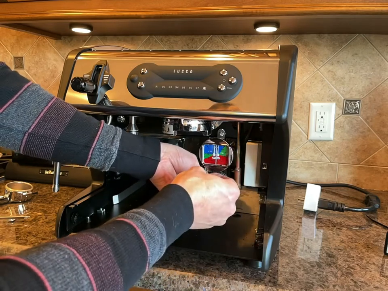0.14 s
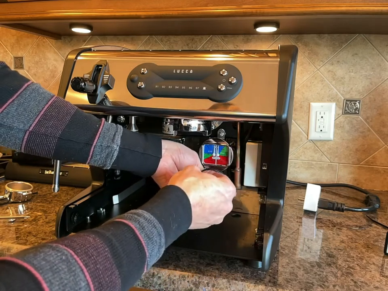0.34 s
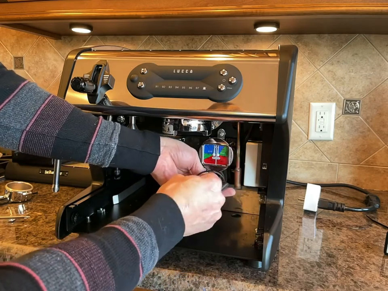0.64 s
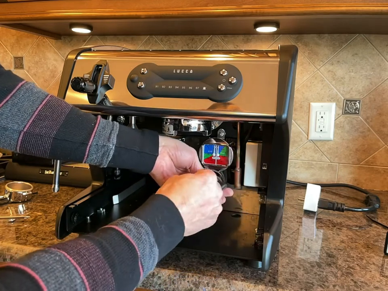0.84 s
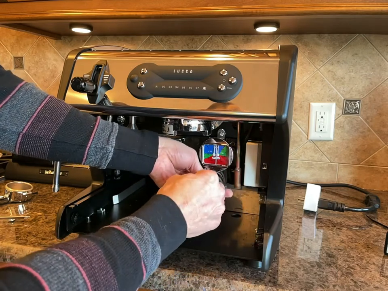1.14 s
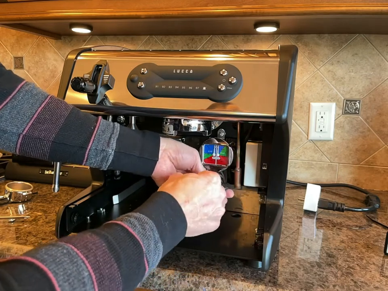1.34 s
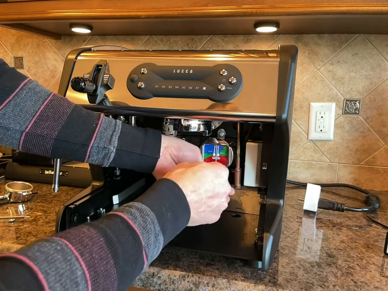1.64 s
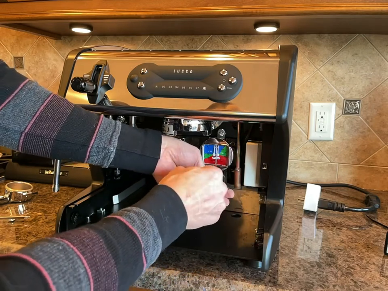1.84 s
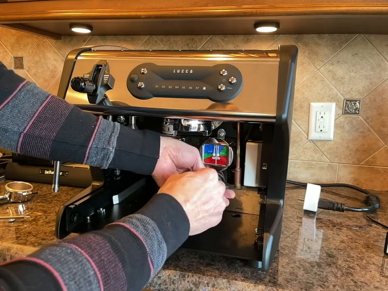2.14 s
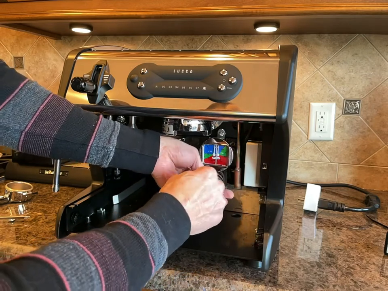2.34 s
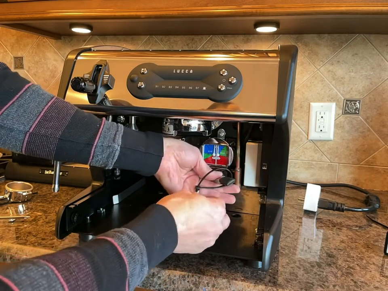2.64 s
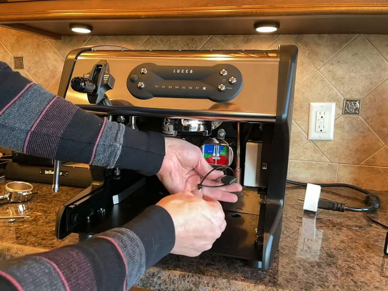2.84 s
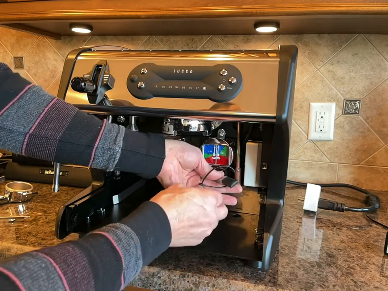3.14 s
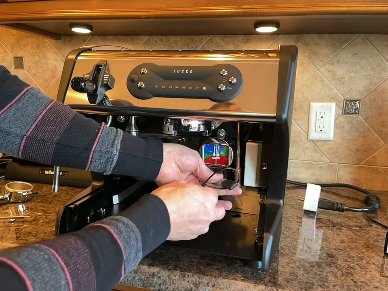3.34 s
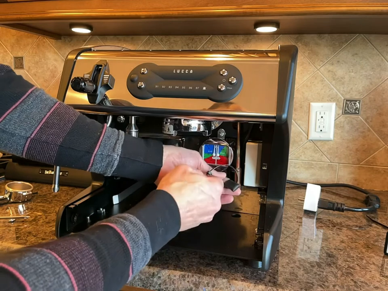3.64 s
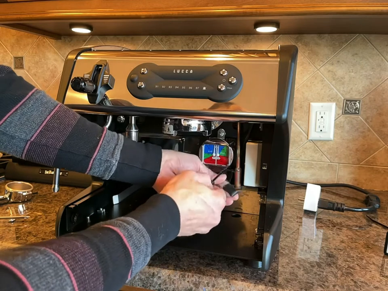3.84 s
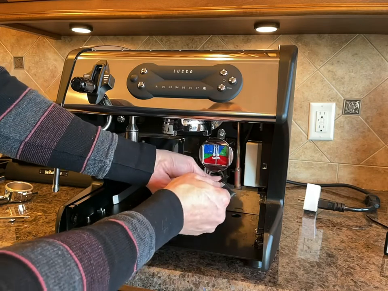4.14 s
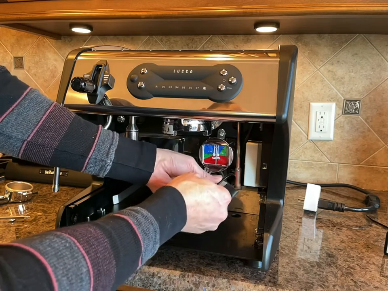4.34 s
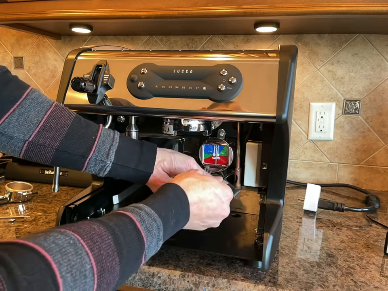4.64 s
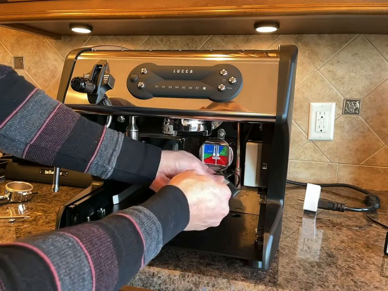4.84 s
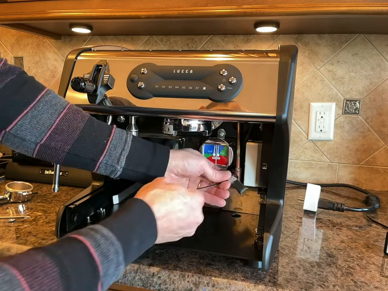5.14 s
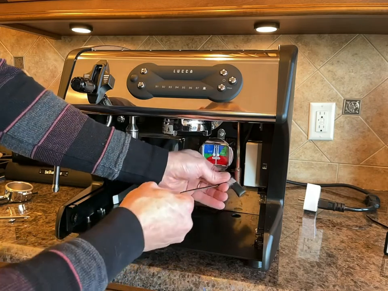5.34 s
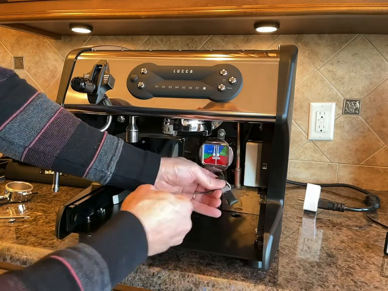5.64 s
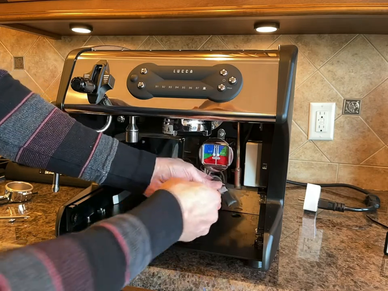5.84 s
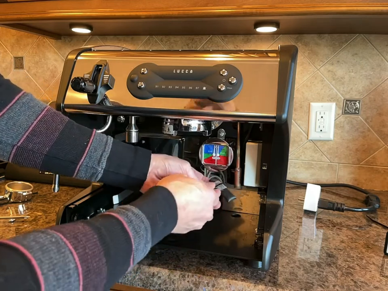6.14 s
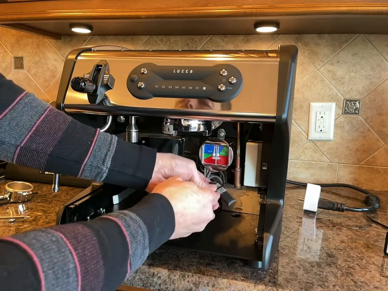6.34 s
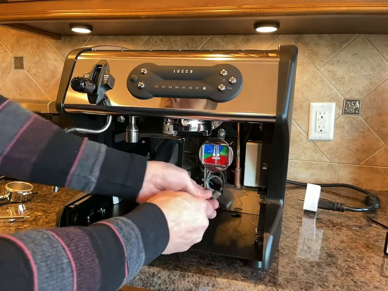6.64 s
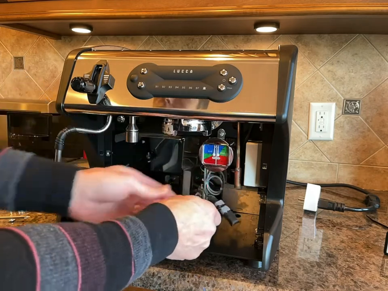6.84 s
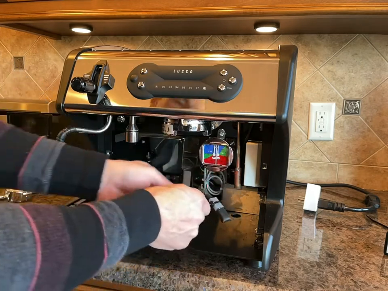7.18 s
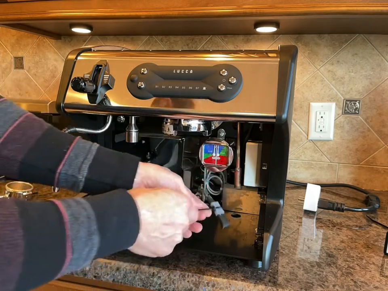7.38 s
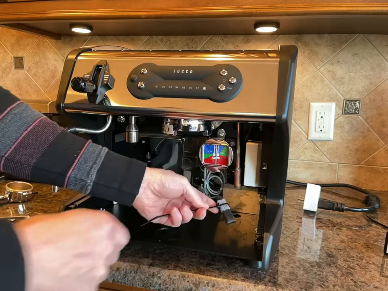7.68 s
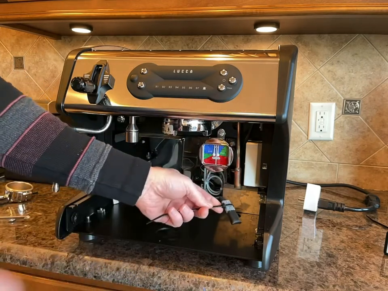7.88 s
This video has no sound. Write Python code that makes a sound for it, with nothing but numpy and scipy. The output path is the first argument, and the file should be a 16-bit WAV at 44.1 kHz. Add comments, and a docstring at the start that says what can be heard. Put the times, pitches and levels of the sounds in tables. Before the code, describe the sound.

A low, steady appliance hum fills a kitchen while a nylon zip tie is fitted nearby. Its tip and fingernails tick against a hose and metal casing, and the catch snaps over several single teeth. The strap slides softly through the fingers, then is pulled in one fast ratcheting zip, ending in slow, tight clicks and a couple of light knocks, each with a brief echo.

```python
"""Tightening a zip tie

A nylon zip tie is pulled tight round a hose inside an espresso machine on a kitchen counter.
Its pawl, the tiny catch in the tie's head, snaps over single teeth, races through one long zip
and ends in slow, tight clicks. Fingers tap and rub the strap. The metal housing and the room
echo the clicks and taps over a low appliance hum."""
import sys
import numpy as np
from scipy import signal
from scipy.fft import rfft, irfft, next_fast_len
from scipy.io import wavfile
from scipy.ndimage import map_coordinates

SR = 44100
rng = np.random.default_rng(int(sys.argv[2]) if len(sys.argv) > 2 else 0)


def materialize(psi):
    """Save the field psi as 16-bit PCM at rate SR to the path in sys.argv[1].

    A 1-D psi becomes a single channel; in a 2-D psi each row is a channel.
    """
    bounded = np.clip(np.atleast_2d(psi).T, -1, 1)
    quanta = np.round(bounded * 32767).astype(np.int16)
    wavfile.write(sys.argv[1], SR, quanta)


N = 353241
TIME = np.arange(N) / SR
CLICK_SAMPLES = 1024
CLICK_HZ = np.fft.rfftfreq(CLICK_SAMPLES, 1 / SR)  # the frequencies a click is built from
# (loose, tight): as the strap is drawn out, its free end gets longer and rings lower and weaker
STRAP_HZ, STRAP_DB = (2508, 1845), (-4.5, -10)

# how fast the strap runs in the long pull: time_s, teeth_per_s
PULL_SPEED = [(4.814, 68.5), (4.87, 99.3), (4.918, 250.0), (4.949, 298.8), (5.009, 225.4), (5.042, 240.8),
              (5.137, 225.0), (5.161, 191.5), (5.234, 170.5), (5.322, 53.3)]


def amp(db):
    """Turn decibels into a gain to multiply by."""
    return 10 ** (np.asarray(db) / 20)


def unit(x):
    """Scale a signal so its average strength (rms) is 1."""
    return x / np.sqrt(np.mean(x ** 2) + 1e-20)


def along(points, hz):
    """Read between the rows of a (frequency, value) table, on a musical (log) scale."""
    frequencies, values = np.transpose(points)
    return np.interp(np.log(hz + 1), np.log(frequencies + 1), values)


def add(track, start_s, sound):
    """Mix a sound into the track."""
    start = int(round(start_s * SR))
    track[start:start + len(sound)] += sound[:N - start]


def wobble(rate):
    """A smooth random curve through `rate` new values a second."""
    return map_coordinates(rng.standard_normal(int(N * rate / SR) + 4), [TIME * rate])


def swell(t, middle_s, length_s):
    """A smooth rise and fall."""
    return np.exp(-(2 * (t - middle_s) / length_s) ** 2)


def filtered(x, gain_at):
    """Turn each frequency up or down by gain_at(hz)."""
    size = next_fast_len(len(x) + 8192)
    return irfft(rfft(x, size) * gain_at(np.fft.rfftfreq(size, 1 / SR)), size)[:len(x)]


def noise(colour):
    """Noise of strength 1, shaped by a (frequency, decibels) table."""
    return unit(filtered(rng.standard_normal(N), lambda hz: amp(along(colour, hz))))


def resonance(centre_hz, width_hz):
    """A part rings most at its own note: gain 1 there, less on either side."""
    return 1 / np.hypot(1, (CLICK_HZ ** 2 - centre_hz ** 2) / ((CLICK_HZ + 1) * width_hz))


def pulse(gain):
    """The sharpest click that has this gain at each frequency."""
    cepstrum = irfft(np.log(np.maximum(gain, 1e-6)))
    fold = 1 + np.sign(CLICK_SAMPLES / 2 - np.arange(CLICK_SAMPLES))  # packs the energy at the start
    fold[0] = 1
    return irfft(np.exp(rfft(cepstrum * fold)))


def room_tone():
    """An appliance hums steadily over a soft rush of air."""
    # the appliance's tones: pitch_hz, level_db
    tones = [(75.4, -49), (183.0, -66.5), (376.8, -81)]
    # colour of the air: frequency_hz, level_db
    air = [(25, -24), (45, -21.5), (75, -20), (100, -19), (165, -20.5), (195, -12), (225, -17.5),
           (310, -21.5), (400, -25.5), (750, -30.5), (2300, -41), (9800, -52), (11300, -54.5), (13500, -55)]
    hum = np.zeros(N)
    for hz, db in tones:
        hum += amp(db + 0.9 * wobble(3.4)) * np.sin(2 * np.pi * hz * TIME + 0.071 * wobble(1.2))
    return hum + amp(-57) * noise(air)


def taps():
    """The strap's tip and the fingernails touch hose and housing; each spot has its own hollow note."""
    # light touches: start_s, level_db, pitch_hz, tick_boost_db
    touches = [(0.228, -34, 1800, -3), (.419, -23, 3630, -8.5), (0.5429, -26, 4530, 13),
               (.622, -25, 3950, 13.5), (0.6508, -21.5, 2730, 14), (0.6697, -20, 2320, 13.5),
               (.684, -20, 2500, 10.5), (.829, -24, 2310, -5), (0.853, -23.5, 2300, -9),
               (1.254, -31, 2730, 1), (2.4294, -25.5, 3040, -2.5), (2.6964, -28.5, 1580, -2.5),
               (3.2606, -23.5, 4370, 2), (3.5155, -43, 1400, 18.5), (4.039, -39, 1430, 6),
               (4.231, -33.5, 3080, 14), (5.7662, -22, 1485, -3), (5.907, -25, 2810, -1),
               (6.7059, -32.5, 2785, -4), (7.583, -21.5, 2710, -0.5)]
    # colour of the hollow knock: frequency_hz, level_db
    knock_colour = [(200, -17.5), (900, -4.5), (1600, 1.5), (2600, 1), (4500, -1.5), (8000, -5.5),
                    (16000, -37)]
    # colour of the bright tick: frequency_hz, level_db
    tick_colour = [(1500, -19), (4000, -10.5), (7000, -5.5), (11500, -0.5), (16000, -8)]
    out = np.zeros(N)
    for start_s, db, pitch_hz, tick_db in touches:
        knock = amp(along(knock_colour, CLICK_HZ)) * (1 + amp(10.5) * resonance(pitch_hz, width_hz=91))
        tick = amp(along(tick_colour, CLICK_HZ) + tick_db)
        click = amp(db) * pulse(np.hypot(knock, tick))
        add(out, start_s + 0.001, rebounds(click, gap_s=0.0005, bounce=0.65))
        echo = echoes(housing_db=-1, housing_fade_s=0.065, room_db=-10.5)
        add(out, start_s + 0.00083, signal.fftconvolve(click, echo))
    return out


def rebounds(click, gap_s, bounce):
    """A part bounces as it lands, spreading its click into quick, fading repeats."""
    delay = np.exp(-2j * np.pi * CLICK_HZ * gap_s)
    return irfft(rfft(click) * (bounce + delay) / (1 + bounce * delay))


def echoes(housing_db, housing_fade_s, room_db):
    """Sound scatters quickly inside the metal housing and dies away slowly in the kitchen."""
    # time the kitchen's echo takes to fall by 60 dB: frequency_hz, fade_s
    kitchen = [(300, 0.54), (2500, 0.5), (9000, .42), (12000, 0.27), (16000, .25)]
    t = np.arange(SR // 2) / SR
    housing = rng.standard_normal(len(t)) * amp(-60 * t / housing_fade_s) * (t > 0.0006)
    hz, frame_s, bands = signal.stft(rng.standard_normal(len(t)), SR, nperseg=256)
    fade = amp(-60 * frame_s / along(kitchen, hz)[:, None])
    room = signal.istft(bands * fade, SR, nperseg=256)[1][:len(t)]
    room *= 1 - np.exp(-t / 0.0031)  # the echo takes a moment to build
    return (amp(housing_db) * housing / np.linalg.norm(housing)
            + amp(room_db) * room / np.linalg.norm(room))


def rubbing():
    """The ribbed strap slides through the fingers with a fine, uneven grain."""
    # slides of the strap: middle_s, length_s, hiss_db, skin_over_hiss_db
    slides = [(0.494, .03, -70, 5), (0.6, 0.053, -65, 8), (.965, 0.062, -69, -2), (1.256, 0.022, -63, 3),
              (2.926, .11, -69.5, 4), (3.073, 0.069, -68.5, 5.5), (3.239, 0.068, -63.5, 7),
              (3.345, 0.068, -65.5, -2), (3.505, 0.13, -60, -12), (3.594, 0.043, -60.5, -8),
              (3.728, 0.13, -63, -1), (4.148, 0.013, -68.5, 11), (4.198, 0.61, -72, 4.5),
              (5.748, 0.052, -55.5, -7), (5.907, .02, -58.5, 4.5), (5.988, .04, -67, -5),
              (6.17, 0.18, -68.5, -1), (7.335, 0.2, -67.5, -0.5), (7.522, 0.15, -58, -3),
              (7.92, 0.4, -73, 7.5)]
    # colour of the strap's hiss: frequency_hz, level_db
    hiss_colour = [(2000, -12.5), (5000, -4.5), (7000, -4.5), (9800, -5.5), (11300, 5.5), (13000, -3.5),
                   (15500, -0.5), (16500, -30.5)]
    # colour of the rubbing skin: frequency_hz, level_db
    skin_colour = [(400, 9.5), (1500, 0), (2500, 4), (5000, 0), (8000, -1), (16000, -22)]
    fidget = amp(-84.5 + 2.5 * wobble(12))  # the hands never quite rest
    hiss_gain, skin_gain = np.zeros((2, N))
    for middle_s, length_s, hiss_db, skin_db in slides:
        slide = amp(hiss_db) * swell(TIME, middle_s, length_s)
        hiss_gain += slide
        skin_gain += amp(skin_db) * slide
    grain = unit(amp(1.4 * wobble(400) + 1.5 * wobble(35)))
    hiss = np.hypot(hiss_gain, fidget) * noise(hiss_colour)
    skin = np.hypot(skin_gain, fidget) * noise(skin_colour)
    return grain * (hiss + skin)


def scuffs():
    """Skin drags over plastic in a short swell of tiny slips."""
    # finger strokes: middle_s, length_s, level_db, centre_hz
    strokes = [(0.647, 0.051, -54, 3860), (6.082, 0.057, -52, 2020), (6.774, .06, -51, 3700)]
    out = np.zeros(N)
    for middle_s, length_s, db, centre_hz in strokes:
        slips = rng.standard_normal(N) * amp(2.9 * wobble(450))
        band = filtered(slips, lambda hz: np.hypot(1, 1.56 * (hz / centre_hz - centre_hz / (hz + 1))) ** -1.22)
        out += amp(db) * swell(TIME, middle_s, length_s) * unit(band)
    return out


def tooth(pawl_hz, strap_hz, upper_hz, strap_db, head_db, treble_db):
    """The pawl slips off a tooth; pawl, head and strap each ring briefly."""
    # colour of the pawl's snap: frequency_hz, level_db
    pawl_colour = [(1500, -41.5), (6000, -19), (7200, -9.5), (9900, -8.5), (10900, 5.5), (12400, -0.5),
                   (13500, -12), (16500, -9.5)]
    # colour of the strap: frequency_hz, level_db
    strap_colour = [(200, -8.5), (850, -9), (1250, 0), (2000, -3.5), (3300, -2.5), (4200, -1.5),
                    (4900, -0.5), (5900, -2), (7100, -1.5), (10000, -13)]
    # the snap's highest treble: frequency_hz, level_db
    treble_colour = [(10000, -28.5), (12200, -7.5), (13200, -1), (14200, -0.5), (15600, -3), (16600, -17.5)]
    pawl = amp(along(pawl_colour, CLICK_HZ) - 4.5) * (1 + amp(2.5) * resonance(pawl_hz, width_hz=360))
    # the bending strap has two notes and gives off little sound below the lower one
    bending = amp(-12) + amp(-2) / np.hypot(1, (strap_hz / (CLICK_HZ + 1)) ** 4)
    bending += amp(2) * resonance(strap_hz, width_hz=310) ** 2
    bending += amp(-0.5) * resonance(upper_hz, width_hz=600) ** 2
    strap = amp(along(strap_colour, CLICK_HZ) + strap_db) * bending
    head = amp(head_db) * resonance(centre_hz=9080, width_hz=2200) ** 2
    treble = amp(along(treble_colour, CLICK_HZ) + treble_db)
    return pulse(np.linalg.norm([pawl, strap, head, treble], axis=0))


def teeth_passed():
    """A running count of the teeth that the long pull draws through the head."""
    return np.cumsum(np.interp(TIME, *np.transpose(PULL_SPEED), left=0, right=0)) / SR


def tightness_at(times):
    """How far the long pull has got: 0 is loose, 1 is tight."""
    passed = teeth_passed()
    return np.interp(times, TIME, passed / passed[-1])


def between(loose, tight, tightness):
    """A value on its way from loose to tight."""
    return loose + tightness * (tight - loose)


def strap_note(loose_hz, tight_hz, tightness):
    """The strap's note falls as its free end gets longer: fast at first, then slowly."""
    growth = 2.4  # length gained in the pull, divided by the starting length
    return tight_hz + (loose_hz - tight_hz) * (1 - tightness) / (1 + growth * tightness)


def single_clicks():
    """The pawl takes one tooth at a time; the hands shift, so each click echoes differently."""
    # single teeth: start_s, level_db, pawl_hz, treble_boost_db, head_db
    teeth = [(1.3156, 4, 10800, 1.5, -1), (1.3389, 5.5, 10300, 1.5, 3), (1.3827, 5, 11100, 4.5, 3.5),
             (1.8947, 7.5, 10500, -6, 2.5), (1.9897, 6.5, 11700, -9.5, 5), (2.19, 7.5, 10540, -10, 6.5),
             (5.3442, 5, 11800, 0, -1), (5.387, 7, 12000, 0, 0.5), (5.4218, 6, 11800, 4.5, 1),
             (5.448, 7, 12000, 5, -2), (5.4963, -1, 10000, 4, 4), (5.5516, 0.5, 10100, -0.5, 3.5),
             (6.2968, 2, 11100, 5, 4), (6.338, 0.5, 11300, -1, 2), (6.406, 1, 8700, -8.5, 2),
             (6.4709, -1, 8300, -7, 2.5), (6.5852, 0, 9200, -12.5, 1.5)]
    out = np.zeros(N)
    times = [row[0] for row in teeth]
    for (start_s, db, pawl_hz, treble_db, head_db), tightness in zip(teeth, tightness_at(times)):
        strap_db = between(*STRAP_DB, tightness) + 0.418 * treble_db  # a sharper snap rings it more
        click = amp(db) * tooth(
            pawl_hz, strap_hz=strap_note(*STRAP_HZ, tightness), upper_hz=between(3300, 3550, tightness),
            strap_db=strap_db - db, head_db=head_db - db, treble_db=treble_db)
        gap_s = 0.00034 * np.exp(0.21 * rng.standard_normal())
        add(out, start_s + 0.00051, rebounds(click, gap_s, bounce=0.71))
        echo = echoes(housing_db=0, housing_fade_s=0.05, room_db=-9.5)
        echo *= amp(between(-2.5, -4.5, tightness))
        add(out, start_s + 0.001, signal.fftconvolve(click, echo))
    return out


def strap_ping(start_s, level_db, pitch_hz, fade_s):
    """One early tooth sets the loose end of the strap ringing."""
    t = np.maximum(TIME - start_s, 0)
    return amp(level_db - 60 * t / fade_s) * np.sin(2 * np.pi * pitch_hz * t)


def long_zip():
    """One pull races the teeth past the pawl; each makes a click, and no two are quite alike."""
    # how hard and how sharply the pawl snaps: time_s, level_db, treble_boost_db
    snaps = [(4.814, 3, 8), (4.91, 4.5, 3), (4.99, 5, 3), (5.05, 3.5, 4.5), (5.18, 5.5, 0),
             (5.28, 6.5, -5.5)]
    # colour of the echo that the housing throws back: frequency_hz, level_db
    echo_colour = [(250, -3), (800, -1.5), (1500, 3), (4000, -2), (9000, -3), (16000, -11.5)]
    snap_s, snap_db, snap_treble_db = np.transpose(snaps)
    direct, clicks = np.zeros((2, N))
    times = TIME[1:][np.diff(np.ceil(teeth_passed())) > 0]
    rocking = wobble(25)  # the strap rocks in the head, changing the pawl's note and the treble
    quirks = rng.standard_normal((len(times), 3))
    for s, tightness, (size, shape, lag) in zip(times, tightness_at(times), quirks):
        # above 235 teeth a second the pawl only skims: it gets quieter,
        # the strap gets louder and the strap's upper note sinks
        skim = max(np.interp(s, *np.transpose(PULL_SPEED)) - 235, 0)
        rock = rocking[round(s * SR)]
        db = np.interp(s, snap_s, snap_db) - 0.0748 * skim
        damping_db = between(-6, -2.5, tightness)  # a running strap rings less
        strap_db = between(*STRAP_DB, tightness) + damping_db + 0.0771 * skim
        head_db = -5.5 + 9.5 * swell(s, middle_s=5.088, length_s=0.059)
        snap = tooth(pawl_hz=between(12030, 11210, tightness) + 200 * rock,
                     strap_hz=strap_note(*STRAP_HZ, tightness),
                     upper_hz=strap_note(4650, 2950, tightness) - 16 * skim,
                     strap_db=strap_db - db, head_db=head_db - db,
                     treble_db=np.interp(s, snap_s, snap_treble_db) + 2.25 * rock)
        # each click runs along the strap to the fingers and back, later as the free end grows
        round_trip_s = between(0.000685, 0.0014, tightness)
        with_return = 1 + amp(-9) * np.exp(-2j * np.pi * CLICK_HZ * round_trip_s)
        click = amp(db + 0.7 * size) * irfft(rfft(snap) * with_return)
        start_s = s + 0.000016 * lag
        add(clicks, start_s, click)
        add(direct, start_s, rebounds(click, gap_s=0.000339 * np.exp(0.082 * shape), bounce=0.86))
    echo = signal.fftconvolve(clicks, echoes(housing_db=-4, housing_fade_s=0.077, room_db=-9.5))[:N]
    return direct + filtered(echo, lambda hz: amp(along(echo_colour, hz)))


def scene():
    """Tie, hands and room, added into one channel."""
    tie = single_clicks() + long_zip()
    tie += strap_ping(start_s=1.895, level_db=-37.5, pitch_hz=2130, fade_s=0.062)
    return (tie + taps() + rubbing() + scuffs() + room_tone())[None]


def record(dry):
    """Cut away the very highest treble."""
    top_hz = 16150
    return np.array([filtered(x, lambda hz: 1 / (1 + (hz / top_hz) ** 100)) for x in dry])


dry = scene()
out = record(dry)
materialize(out)
```